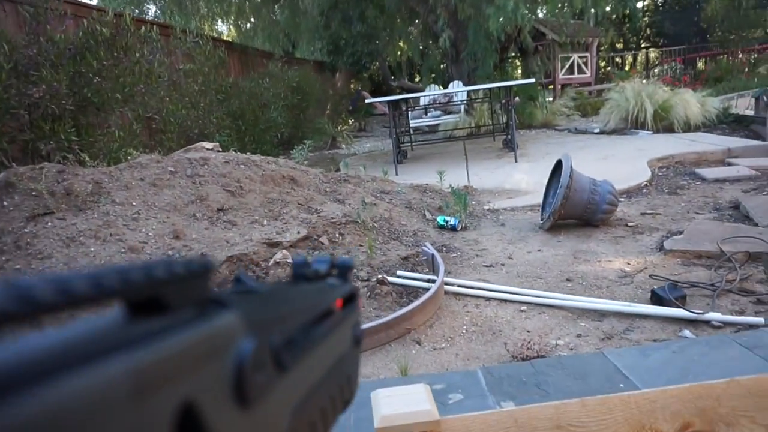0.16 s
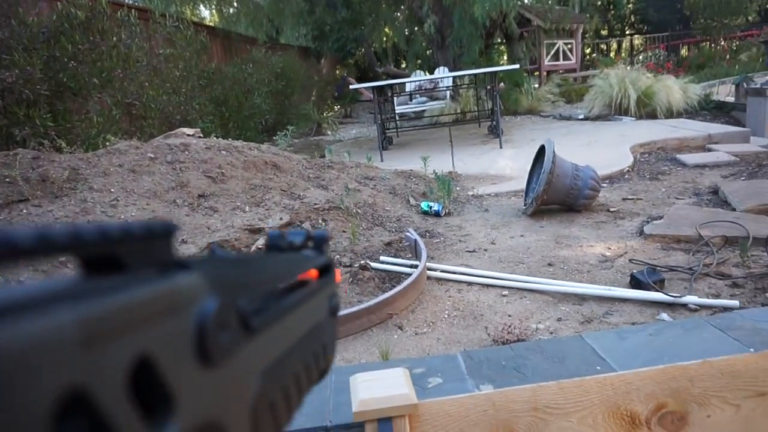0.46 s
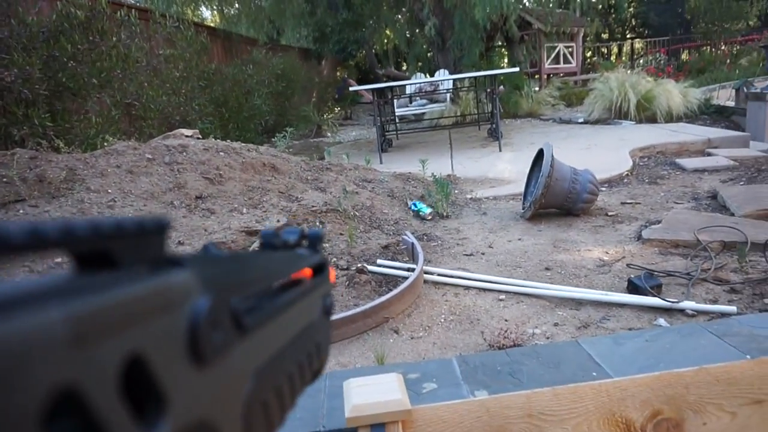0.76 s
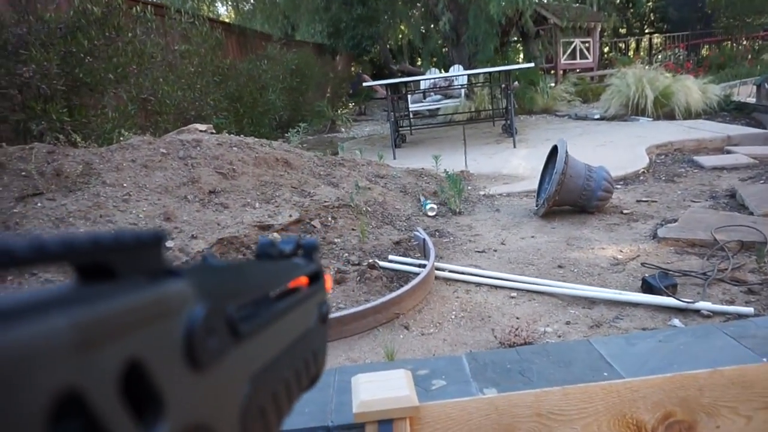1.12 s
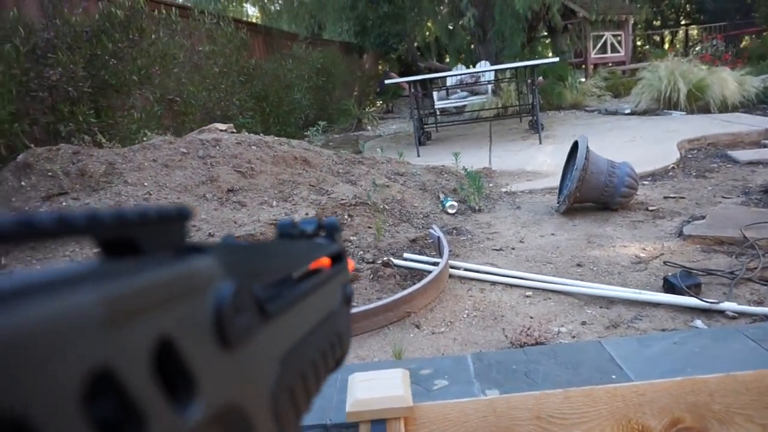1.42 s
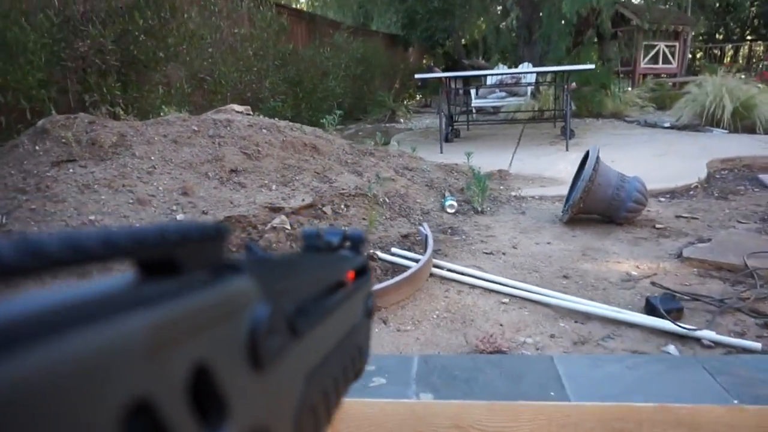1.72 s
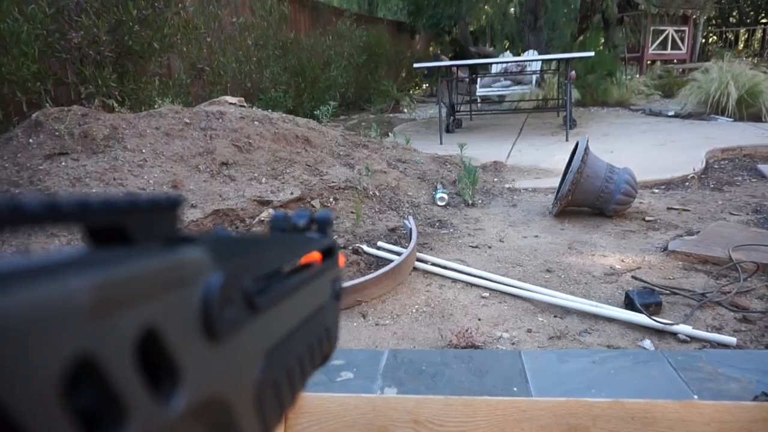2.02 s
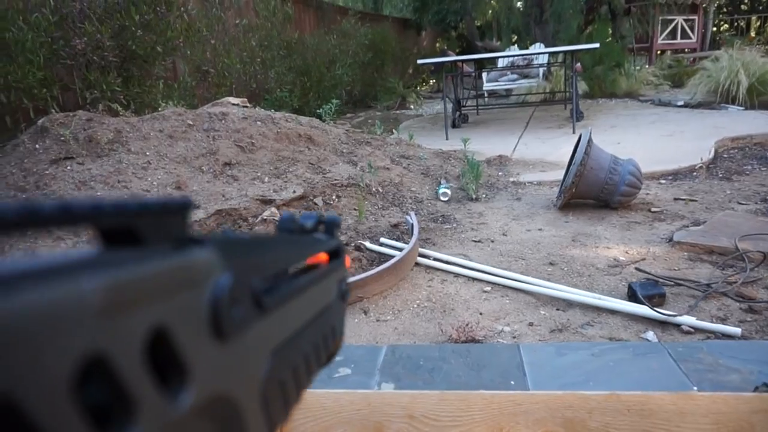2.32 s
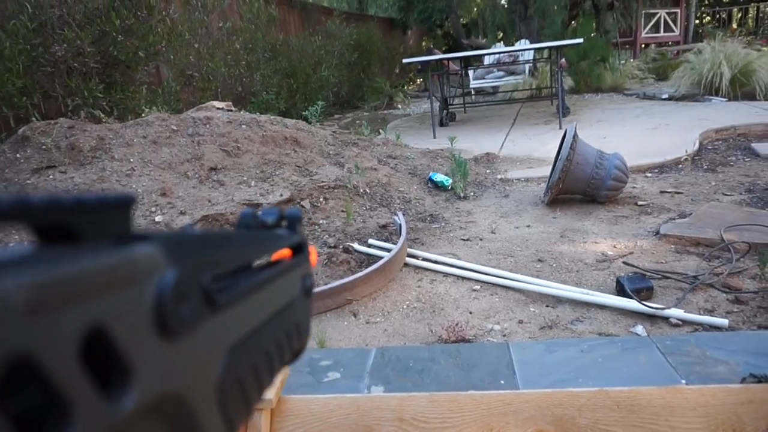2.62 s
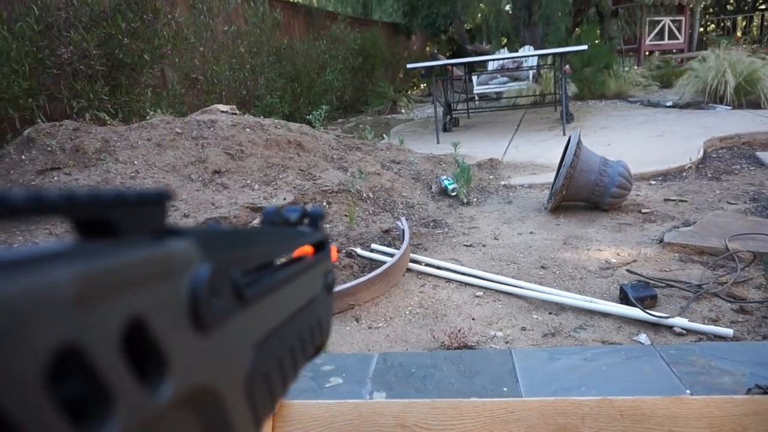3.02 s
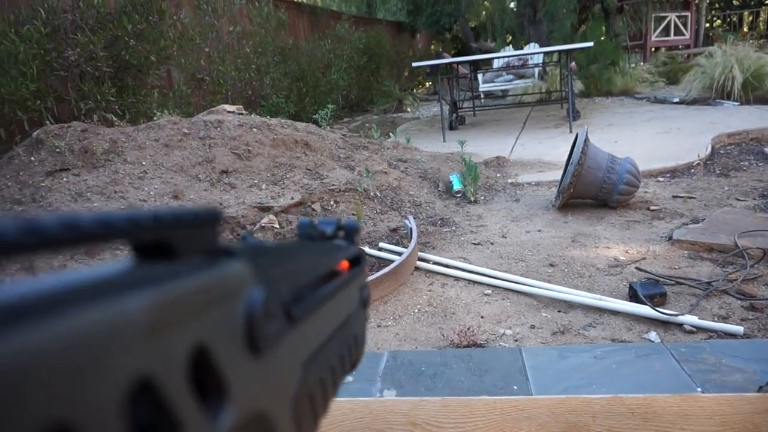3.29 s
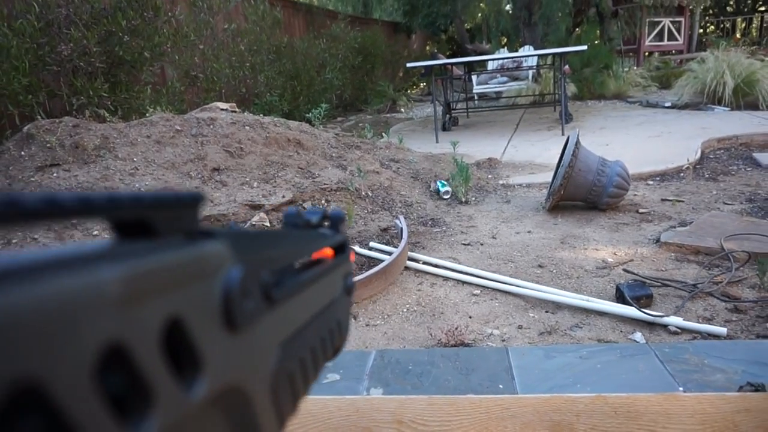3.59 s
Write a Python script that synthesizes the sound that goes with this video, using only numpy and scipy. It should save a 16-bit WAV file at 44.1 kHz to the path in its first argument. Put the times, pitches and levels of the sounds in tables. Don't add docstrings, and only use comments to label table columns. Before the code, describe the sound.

An electric airsoft rifle, close and slightly left, creaks at 0.1 s, then fires once at 0.55 with trigger clack, gear whine, crack and plastic slam. A can rattles faintly until 1.5; a far whistle swells near 1.35, cloth rustles around 2. Four quick shots come at 2.26-2.5, a tin ping and dent at 2.7, seven shots at 2.9-3.36. Pellets smack dirt; yard echoes and clacks follow.

```python
import sys
import numpy as np
from scipy import signal
from scipy.fft import rfft, irfft
from scipy.io import wavfile
from scipy.ndimage import uniform_filter1d

SR = 44100
rng = np.random.default_rng(int(sys.argv[2]) if len(sys.argv) > 2 else 0)


def put_to_file(sound):
    columns = np.atleast_2d(sound).T
    safe = np.clip(columns, -1, 1)
    whole_steps = np.round(safe * 32767)
    wavfile.write(sys.argv[1], SR, whole_steps.astype(np.int16))


def how_loud(loudness_db):
    steps = np.asarray(loudness_db, float) / 20
    return 10 ** steps


N = 165375

# (time [s], crack level [dB])
SHOTS = [(0.5511, -11.5), (2.2603, -12), (2.3462, -13.5), (2.4207, -12), (2.4924, -12), (2.905, -12.5),
         (2.9969, -11.5), (3.0719, -13), (3.143, -11.5), (3.2157, -11), (3.285, -12), (3.3559, -12.5)]
# (frequency [Hz], level [dB])
CRACK_COLOUR = [(1500, -2), (3000, 9), (6000, 6), (16000, -15)]
# (frequency [Hz], level [dB])
SLAM_COLOUR = [(400, 6.5), (1300, 2), (4000, -9), (16000, -15.5)]
# (frequency [Hz], level [dB], decay T60 [s])
SHELL_MODES = [(407, -0.5, 0.075), (678, 1, 0.11), (1265, -4.5, 0.062), (2055, -9, 0.098),
               (2437, -3, 0.073), (3020, -26.5, 0.048), (5080, -37.5, 0.053)]


def shots():
    out, t = np.zeros(N), np.arange(4096) / SR
    push = np.sin(2 * np.pi * 103.4 * t) * half_swell(t, 0.028)
    hoot = np.sin(2 * np.pi * 320 * t) * half_swell(t, 0.011)
    thump = how_loud(-12 - 60 * t / 0.059) * np.sin(2 * np.pi * 279 * t)
    slam_lag_s = 0.0048
    for s, crack_db in SHOTS:
        slam_db = crack_db - 4
        add(out, s - 0.01454, -how_loud(-33) * push)
        add(out, s - 0.011, how_loud(-27.5) * hoot)
        add(out, s - 0.0012, how_loud(crack_db) * puff(CRACK_COLOUR, 0.0056, 0.013))
        snap = tint(t == t[64], CRACK_COLOUR)[:128] / 30
        add(out, s - 0.0003, how_loud(crack_db + 3) * snap)
        slam = puff(SLAM_COLOUR, 0.00044, 0.026) + thump
        slam_tail = how_loud(-13) * puff(SLAM_COLOUR, 0.00065, 0.084)
        add(out, s + slam_lag_s - 0.001, how_loud(slam_db) * (slam + slam_tail))
        add(out, s + slam_lag_s, how_loud(slam_db - 1.5) * ring(SHELL_MODES, last=0.25))
    return out


# (start [s], end [s], start level [dB], end level [dB], top mesh frequency [Hz])
WINDINGS = [
    (.482, 0.545, -31.5, -22, 1396),
    (2.191, 2.249, -24, -20.5, 1330),
    (2.873, 2.899, -36, -38, 1088),
]
# (start [s], end [s], level [dB])
GEAR_RUNS = [
    (0.501, 0.557, -35.5),
    (2.177, 2.478, -33),
    (2.874, 3.369, -32.5),
]
# (frequency [Hz], level [dB])
GEAR_COLOUR = [(120, -53), (200, -16), (548, -4.5), (763, 1.5), (1560, -4.5), (9580, -21), (16000, -38.5)]


def gearbox():
    out, t = np.zeros(N), np.arange(N) / SR
    wobble = how_loud(2.85 * drift(N, 100))
    grit = tint(wobble * rng.standard_normal(N) * how_loud(1.64 * rng.exponential(1, N)), GEAR_COLOUR)
    jitter = drift(N, 60)
    for start, end, start_db, end_db, top_hz in WINDINGS:
        u = np.clip((t - start) / (end - start), 0, 1)
        mesh_hz = top_hz * (0.62 + 0.43 * np.sqrt(u)) * (1 + 0.0793 * jitter)
        phase = 2 * np.pi * np.cumsum(mesh_hz) / SR
        whine = np.sin(phase) + 0.54 * np.sin(phase / 2) + 0.2 * np.sin(2 * phase)
        whine = evened(wobble[::-1] * whine)
        fade = np.minimum(np.minimum(u, 1 - u) / 0.057, 1)
        level = how_loud(start_db + (end_db - start_db) * u)
        out += fade * level * (0.72 * whine + 0.3 * grit)
    releases = [s for s, _ in SHOTS]
    since = t - np.array([-1] + releases)[np.searchsorted(releases, t)]
    loaded_grit = grit[::-1] * how_loud(-2 * np.exp(-since / 0.049))
    for start, end, db in GEAR_RUNS:
        coast_db = -190 * np.maximum(t - end, 0)
        out += np.clip((t - start) / 0.02, 0, 1) * how_loud(db + coast_db) * loaded_grit
    return out


# (time
# [s], level [dB], hardest struck frequency [Hz])
CLACKS = [(0.466, -22, 684), (0.669, -17.5, 900), (0.692, -29.5, 900), (2.177, -18.5, 550),
          (2.286, -46, 1800), (2.508, -20.5, 800), (2.597, -19.5, 900), (2.618, -25, 1210),
          (2.831, -36, 1300), (2.852, -15, 1090), (2.893, -18, 1200), (3.015, -26, 1500), (3.029, -26, 800),
          (3.088, -23, 900), (3.106, -26.5, 800), (3.316, -32, 1400), (3.381, -23, 900), (3.467, -15, 840),
          (3.49, -25, 414)]
# (frequency [Hz], level [dB])
CLACK_COLOUR = [(120, -17), (200, -2), (1320, 8.5), (2020, -7), (2650, -3.5), (16000, -31)]
# (frequency [Hz], level [dB])
SMACK_COLOUR = [(240, 8.5), (400, -15), (964, -1), (3020, -1), (8240, -1.5), (16000, -9.5)]


def trigger():
    out = np.zeros(N)
    for s, db, hz in CLACKS:
        add(out, s - 0.004, how_loud(db - 3) * puff(CLACK_COLOUR, 0.012, 0.031))
        add(out, s, how_loud(db - 4) * ring(struck(SHELL_MODES, hz, fall_db=3), last=0.97))
        rattle = puff(CLACK_COLOUR, 0.000353, 0.057) + how_loud(-26) * puff(CLACK_COLOUR, 0.0013, 0.18)
        add(out, s, how_loud(db - 5.5) * rattle)
        add(out, s, how_loud(db - 10.5) * puff(SMACK_COLOUR, 0.00066, 0.018))
    return out


# (time [s], level [dB], frequency [Hz], decay T60 [s])
SPRING_HUM = (0.85, -56.5, 1150, 2)


def spring():
    out, t = np.zeros(N), np.arange(SR) / SR
    s, db, hz, t60 = SPRING_HUM
    add(out, s, how_loud(db - 60 * t / t60) * np.sin(2 * np.pi * hz * t))
    return out


# (time [s], level [dB])
KNOCKS = [
    (1.549, -39.5),
    (1.69, -41.5),
]


def grip():
    out = np.zeros(N)
    for s, db in KNOCKS:
        add(out, s, how_loud(db - 2.5) * puff([(300, 2.5), (1000, -5), (4000, -45)], 0.00032, 0.067))
    return out


# (time [s], level [dB], hardest struck frequency [Hz])
CREAKS = [
    (0.0393, -48.5, 1447),
    (0.0555, -48.5, 1895),
    (0.0709, -32.5, 2250),
    (0.0774, -43, 7130),
    (0.086, -43, 1310),
    (0.089, -39.5, 3300),
    (0.1118, -39, 3800),
    (0.119, -53.5, 7170),
    (0.126, -53, 7400),
]
# (frequency [Hz], level [dB], decay T60 [s])
CREAK_MODES = [(1423, -5, 0.076), (3080, 2, 0.02), (4610, -2.5, 0.013), (5380, -6, 0.013),
               (7250, -6.5, 0.019)]


def stock():
    out = np.zeros(N)
    for s, db, hz in CREAKS:
        add(out, s, how_loud(db + 2) * ring(struck(CREAK_MODES, hz, fall_db=7.5), spread_db=6))
    return out


# (time [s], level [dB])
PELLETS = [(0.5826, -21.5), (2.4476, -23), (2.5219, -18), (2.7042, -30.5), (2.935, -26.5), (3.028, -21),
           (3.1045, -23), (3.3153, -18.5), (3.3871, -24), (3.5397, -40), (3.553, -36)]


def dirt():
    out = np.zeros(N)
    for s, db in PELLETS:
        smack = puff(SMACK_COLOUR, 0.0013, 0.022) + how_loud(-24) * puff(SMACK_COLOUR, 0.0012, 0.13)
        add(out, s, how_loud(db + 3.5) * smack)
    return out


# (time [s], level [dB], hardest struck frequency [Hz])
TUMBLES = [(0.889, -50.5, 1280), (0.908, -46, 4500), (0.949, -46, 2920), (0.98, -48, 1490),
           (1.0104, -45.5, 2300), (1.029, -35, 2320), (1.058, -45, 1970), (1.12, -53, 2300),
           (1.151, -46.5, 1640), (1.183, -51, 940), (1.201, -60, 2300), (1.244, -55, 1400),
           (1.305, -64, 1400), (1.368, -55.5, 1500), (1.376, -54, 2460), (1.398, -59, 1540),
           (1.495, -63, 2500), (3.651, -37.5, 800), (3.73, -47, 1150)]
# (frequency [Hz], level [dB], decay T60 [s])
CAN_MODES = [(900, 6.5, 0.075), (1150, -12, 0.46), (1460, -3, 0.2), (2300, -1.5, 0.08), (2440, -9.5, 0.16),
             (2770, -13.5, 0.12), (3230, -7.5, 0.12), (4015, 4, 0.03), (4810, 4.5, 0.026),
             (5700, -18, 0.086)]
# (time [s], level [dB])
DENT_AT = (2.703, -24)
# (frequency [Hz], level [dB], decay T60 [s])
DENT_MODES = [(930, -12, 0.38), (1430, -8.5, 0.29), (2140, -14, 0.16), (2530, -1, 0.26), (3940, 4, 0.1),
              (4190, -5, .2), (5970, -27, 0.17), (6340, -1, 0.16), (10420, -22, 0.24)]
# (time [s], level [dB])
PING_AT = [
    (2.6516, -21),
]
# (frequency [Hz], level [dB], decay T60 [s])
PING_MODES = [(9400, -10, .15), (9534, -5, 0.3), (10400, -11, .1), (10740, -9, .11), (12000, -5, 0.074),
              (12000, -3, 0.06), (13000, -7, .08), (15010, -14, .07)]


def can():
    out = np.zeros(N)
    for s, db, hz in TUMBLES:
        modes = struck(CAN_MODES, hz, fall_db=6)
        add(out, s, how_loud(db + 5) * ring(modes, detune=0.019, last=0.71, waver=1.28))
        scrape_db = db - 7 + 5.4 * np.log2(hz / 2000)
        add(out, s, how_loud(scrape_db) * puff(SMACK_COLOUR, 0.002, 0.029))
    s, db = DENT_AT
    add(out, s, how_loud(db) * ring(DENT_MODES, spread_db=4, detune=0.0043, last=0.87, waver=2.4))
    add(out, s, how_loud(db - 16) * puff(SMACK_COLOUR, 0.0035, 0.28))
    sizzle = [(4000, 4.5), (8000, -3), (9600, -2), (13000, -3), (16000, -12)]
    for s, db in PING_AT:
        add(out, s, how_loud(db - 7) * ring(PING_MODES, spread_db=1.5, detune=0.004, last=1, waver=2.5))
        add(out, s, how_loud(db - 22.5) * puff(sizzle, 0.0005, 0.58))
    return out


# (time [s], level [dB], frequency [Hz])
TICKS = [(.268, -50, 6000), (1.257, -38, 5740), (1.306, -56, 6300), (1.368, -53, 7000),
         (1.397, -56.5, 7000), (1.521, -52, 14000), (1.733, -58, 6000), (1.753, -44, 4330),
         (1.7709, -46.5, 6000), (1.817, -50, 6600), (1.872, -55, 12000), (2.084, -33, 4470),
         (2.105, -41, 5990), (2.128, -48, 7000), (2.768, -38, 13000), (2.794, -24, 5970),
         (2.8004, -24, 7300), (3.506, -28, 11000), (3.587, -65, 10000), (3.656, -55.5, 9500),
         (3.745, -33, 5360)]


def ticks():
    out = np.zeros(N)
    for s, db, hz in TICKS:
        colour = [(hz / 3, -14), (hz, 0), (hz * 2, -10), (hz * 4, -30)]
        add(out, s, how_loud(db - 10) * puff(colour, 0.00079, 0.014))
    return out


# (time [s], level [dB])
SLIDE = [
    (1.87, -56),
    (1.939, -41.5),
    (2.062, -44),
    (2.14, -65.5),
]
# (frequency [Hz], level [dB])
CLOTH_COLOUR = [(120, -42), (200, -19), (851, -2), (1080, -6), (1450, -1.5), (3370, -19.5), (16000, -40)]


def sleeve():
    out = np.zeros(N)
    s, db = np.transpose(SLIDE)
    t = np.arange(s[0], s[-1], 1 / SR)
    clumps = how_loud(2 * drift(len(t), 150))
    rustle = tint(clumps * rng.standard_normal(len(t)), CLOTH_COLOUR)
    add(out, s[0], how_loud(np.interp(t, s, db)) * rustle)
    return out


# (frequency [Hz], decay T60 [s])
YARD_DECAY = [(200, 0.3), (1000, 0.64), (5000, 0.68), (15000, 0.72)]


def echoes(x):
    onset = np.minimum(np.arange(SR // 2) / SR / 0.012, 1)
    taps = rng.standard_normal((2, SR // 2)) * onset
    hz, t, z = signal.stft(taps, SR, nperseg=256)
    bass_cut = np.minimum(hz / 600, 1)[:, None] ** 2
    decay = how_loud(-60 * t / read(YARD_DECAY, hz)[:, None])
    tail = signal.istft(z * bass_cut * decay, SR, nperseg=256)[1]
    return signal.fftconvolve(x[None], tail / np.linalg.norm(tail[0]), axes=1)[:, :N]


# (frequency [Hz], level [dB])
AIR_COLOUR = [(15, -19), (25, -8.5), (111, -1), (687, -18.5), (1390, -19), (1830, -26.5), (4130, -36.5),
              (15200, -48), (16500, -41)]
# (time [s], level [dB])
WHISTLE = [
    (0, -74),
    (.25, -67),
    (.6, -72),
    (1.2, -62),
    (1.3, -51.5),
    (1.36, -50),
    (1.42, -60.5),
    (1.55, -72.5),
    (3.75, -74),
]


def air():
    t = np.arange(N) / SR
    rumble = drift_swell = how_loud(drift(N, 5000))
    rumble = drift_swell * tint(rng.standard_normal(N), AIR_COLOUR)
    fuzz = rng.standard_normal(N) + 1j * rng.standard_normal(N)
    fuzz = signal.lfilter([1], [1, -np.exp(-np.pi * 45 / SR)], fuzz)
    whistle_hz = 1450 + 130 * np.sin(2 * np.pi * (t - 1.25))
    whistle = evened((fuzz * np.exp(2j * np.pi * np.cumsum(whistle_hz) / SR)).real)
    s, db = np.transpose(WHISTLE)
    line = tint(rng.standard_normal(N), [(15700, -40), (15950, 0), (16200, -40)])
    return how_loud(-58) * rumble + how_loud(np.interp(t, s, db)) * whistle + how_loud(-80) * line


def ducking(x):
    power_db = 10 * np.log10(abs(uniform_filter1d(x ** 2, size=800)) + 1e-12)
    fall = np.arange(N) * 21.5 / SR
    held_db = np.maximum.accumulate(power_db + fall) - fall
    return how_loud(-0.6 * np.maximum(held_db + 46.5, 0))


def evened(x):
    return x / np.sqrt(np.mean(x ** 2) + 1e-20)


def drift(n, size):
    return evened(uniform_filter1d(rng.standard_normal(n), size=size))


def half_swell(t, length_s):
    return np.sin(np.pi * np.minimum(t / length_s, 1)) ** 2


def read(points, hz):
    f, value = np.transpose(points)
    return np.interp(np.log(hz + 1), np.log(f + 1), value)


def add(mix, s, sound):
    part = mix[round(s * SR):][:len(sound)]
    part += sound[:len(part)]


def tint(x, shape):
    hz = np.fft.rfftfreq(len(x), 1 / SR)
    bass_cut = np.minimum(hz / shape[0][0], 1) ** 3
    return evened(irfft(rfft(x) * how_loud(read(shape, hz)) * bass_cut, len(x)))


def puff(shape, rise_s, t60):
    t = np.arange(4096) / SR
    return tint(rng.standard_normal(len(t)), shape) * np.minimum(t / rise_s, 1) * how_loud(-60 * t / t60)


def ring(modes, spread_db=2.5, detune=0.03, last=0.59, waver=1.0):
    t = np.arange(6000)[:, None] / SR
    hz, db, t60 = np.transpose(modes)
    r = rng.standard_normal((3, len(hz)))
    noise = rng.standard_normal((len(t), len(hz)))
    flutter = waver * evened(uniform_filter1d(noise, size=120, axis=0))
    level = how_loud(db + spread_db * r[0] + 0.52 * flutter - 60 * t / (last * t60))
    phase = 2 * np.pi * hz * (1 + detune * r[1]) * t + r[2] + 0.45 * flutter[::-1]
    x = (level * np.sin(phase)).sum(1)
    return np.minimum(t[:, 0] / 0.00089, 1) * x / abs(x).max()


def struck(modes, centre_hz, fall_db):
    return [(hz, db - fall_db * np.log2(hz / centre_hz) ** 2, t60) for hz, db, t60 in modes]


def thinned(x, low_hz):
    return signal.sosfilt(signal.butter(3, low_hz, "high", fs=SR, output="sos"), x)


def spread(x, side, same, lag_s, blur_s):
    t = np.arange(1024) / SR
    smear = rng.standard_normal(len(t)) * how_loud(-60 * t / blur_s)
    smear = rfft(smear / np.linalg.norm(smear), N)
    hz, z = np.fft.rfftfreq(N, 1 / SR), rfft(x)
    tilt = how_loud(read(side, hz) / 2)
    likeness = np.clip(read(same, hz), -1, 1)
    likeness = 1 - (1 - likeness) * np.minimum(hz / 700, 1) ** 4
    early = np.exp(2j * np.pi * hz * lag_s * np.exp(-(hz / 3200) ** 2))
    right = likeness * early + np.sqrt(1 - likeness ** 2) * smear
    return irfft(np.array([z * tilt, z * right / tilt]) * np.minimum(hz / 55, 1), N)


# (frequency [Hz], left minus right [dB])
GUN_SIDE = [(150, 0), (350, 1.5), (1200, 14), (3000, 7.5), (9000, 3)]
# (frequency [Hz], likeness [0-1])
GUN_SAME = [(200, .99), (700, .9), (1500, .65), (4000, .45), (12000, .65)]
# (frequency [Hz], left minus right [dB])
YARD_SIDE = [(60, -3.5), (380, 4.5), (2380, 5), (15000, -0.5)]
# (frequency [Hz], likeness [0-1])
YARD_SAME = [(60, 0.75), (380, 0.98), (2380, 0.18), (15000, 0.75)]


def scene():
    handling = thinned(trigger() + spring() + grip() + stock(), 300)
    parts = (shots(), handling, gearbox())
    gun = sum(parts)
    near = sum(spread(part, GUN_SIDE, GUN_SAME, 0.00021, 0.02) for part in parts)
    far = thinned(dirt() + can() + ticks(), 520)
    yard = spread(far + sleeve(), YARD_SIDE, YARD_SAME, 0, 0.0047)
    background = spread(air() * ducking(gun), YARD_SIDE, YARD_SAME, 0, 0.11)
    return near + yard + background + echoes(how_loud(-13) * gun + how_loud(-10) * far)


def top_cut(x):
    return signal.sosfilt(signal.butter(12, 16960, fs=SR, output="sos"), x)


def record(dry):
    rounded = 0.92 * np.tanh(dry / 0.81)
    low_pass = signal.firwin(255, 15900, window=("kaiser", 7), fs=SR)
    mix = signal.oaconvolve(rounded, low_pass[None], "same")
    return top_cut(mix)


dry = scene()
out = record(dry)
put_to_file(out)
```